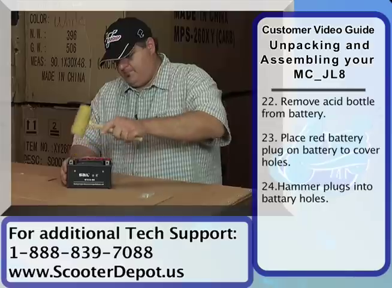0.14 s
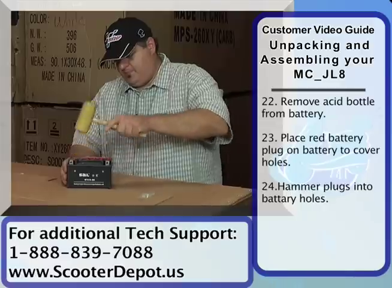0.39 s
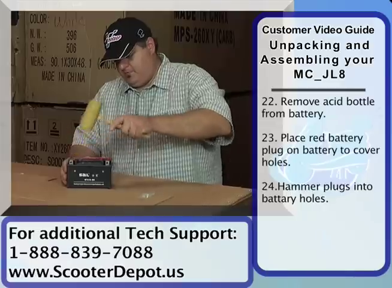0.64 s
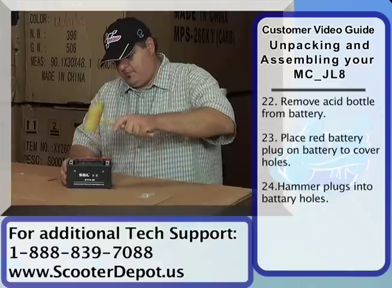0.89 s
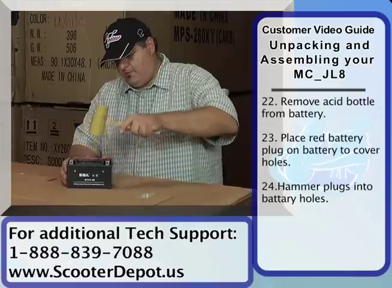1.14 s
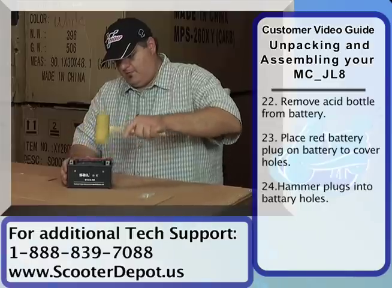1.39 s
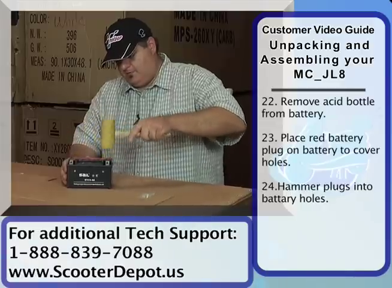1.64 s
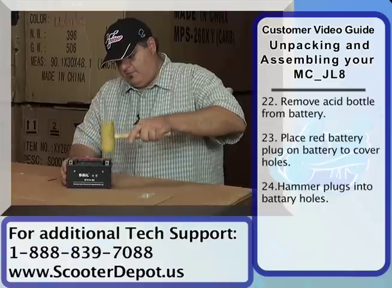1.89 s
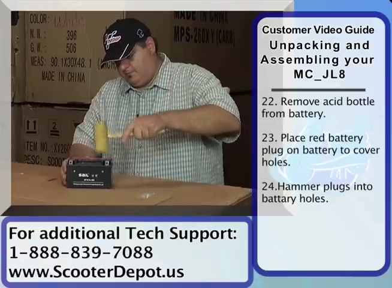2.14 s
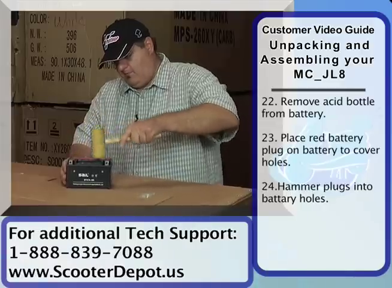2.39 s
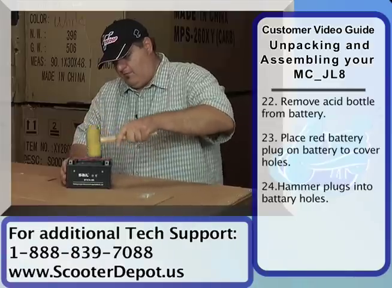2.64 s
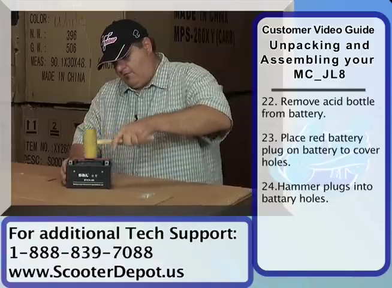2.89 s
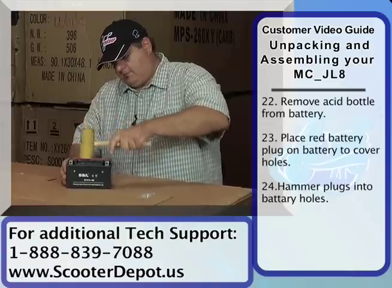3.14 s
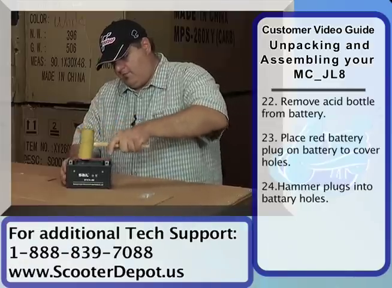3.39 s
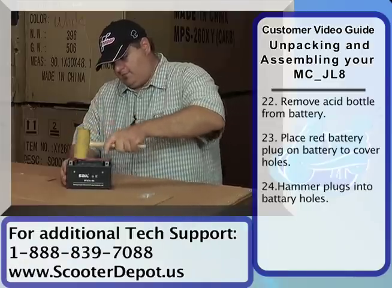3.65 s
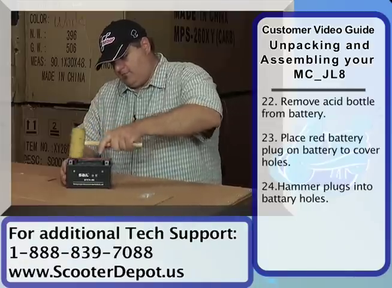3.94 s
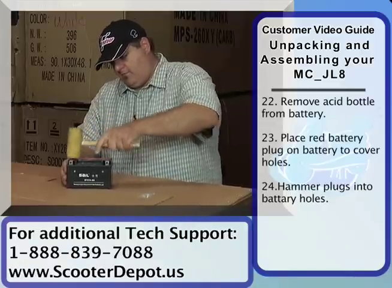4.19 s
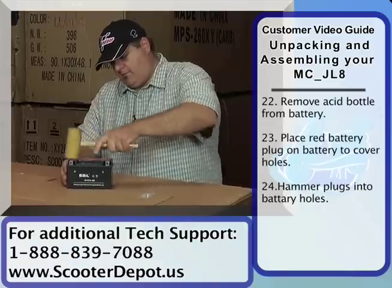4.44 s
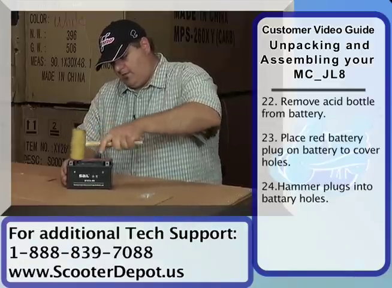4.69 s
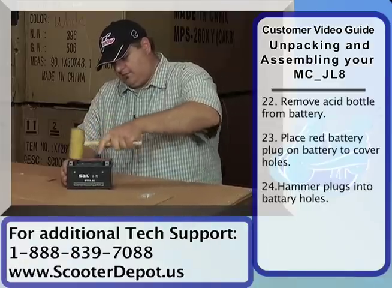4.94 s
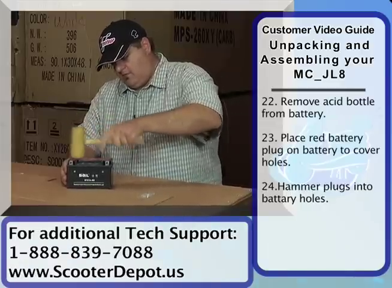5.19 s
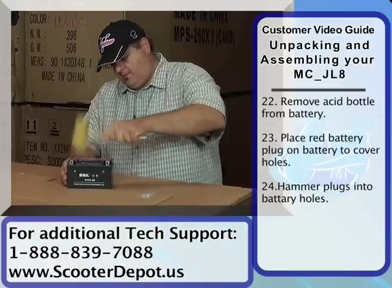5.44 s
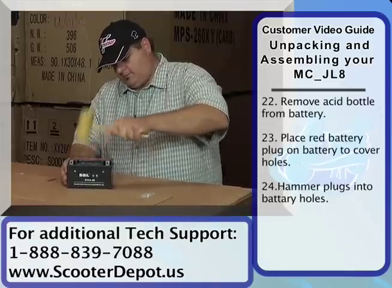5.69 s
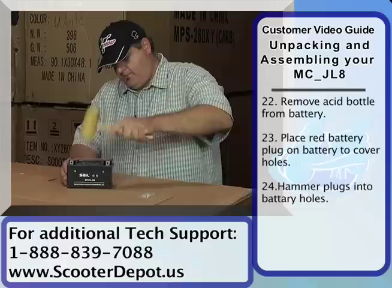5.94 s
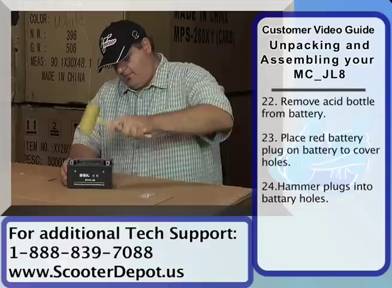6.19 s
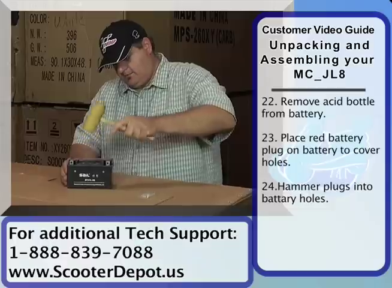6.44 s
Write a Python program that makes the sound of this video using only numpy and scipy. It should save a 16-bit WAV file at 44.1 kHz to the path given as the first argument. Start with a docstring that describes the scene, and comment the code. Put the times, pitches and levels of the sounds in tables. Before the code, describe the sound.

Quick even mallet taps crack against a plastic-topped battery on a wooden table, with rattling double clicks and short echoes in a large storeroom.

```python
"""Mallet tapping on a battery

A small mallet taps a plastic strip onto a battery on a wooden table in a large storeroom. Blows and
landings are trains of clicks that ring damped modes, the case knock is a set of swelling and choked sines,
and the wooden table rings from soft pushes. The room's echo is decaying bands of noise that arrive late;
ceiling and nearby boxes are discrete delays, and the low steady floor is shaped noise."""
import sys
import numpy as np
from scipy import signal
from scipy.io import wavfile
from scipy.ndimage import uniform_filter1d

SR = 44100
rng = np.random.default_rng(int(sys.argv[2]) if len(sys.argv) > 2 else 0)


def magnitude_from_level(level_db):
    """Linear magnitude for a level in decibels (20 dB per decade)."""
    exponent = np.asarray(level_db, float) / 20
    return 10 ** exponent


def unload_wav(signal):
    """Save mono or channel-first audio to the path in sys.argv[1] as 16-bit WAV at rate SR, clipped to [-1, 1]."""
    wavfile.write(
        sys.argv[1],
        SR,
        np.round(np.clip(np.atleast_2d(signal).T, -1, 1) * 32767).astype(np.int16),
    )


N = 289737

# Mallet blows. Each row: start in seconds, relative crack level in dB, crack brightness in dB per octave,
# knock pitch in Hz, relative knock level in dB.
BLOWS = [(0.2102, -11, 2, 1595, -39), (0.48, -10.5, 3.5, 1420, -25), (0.7402, -10, 3, 1440, -27.5),
         (1.0016, -5.5, -0.5, 1310, -25.5), (1.2667, -9, 1.5, 1550, -36), (1.5302, -9.5, 2, 1370, -21),
         (1.7893, -9.5, 1, 1720, -12), (2.0525, -7.5, 3.5, 1312, -12), (2.3158, -11.5, 6.5, 1260, -17),
         (2.573, -4, -7.5, 1460, -19.5), (2.8405, -4, 2, 1200, -16.5), (3.1146, -1, -4, 1097, -21),
         (3.382, -8, -0.5, 1117, -15.5), (3.6501, -3.5, -4, 1154, -12.5), (3.9089, -4, -1.5, 1240, -18.5),
         (4.1701, -4, -1.2, 1080, -12.5), (4.4316, -7.5, -3.5, 1092, -13.5), (4.6972, -10, -6.5, 1200, -16),
         (4.9534, -10.5, 4.5, 1250, -16.5), (5.218, -9, 1.8, 1070, -13), (5.481, -8.5, 2.5, 1148, -12),
         (5.741, -9, 0.1, 1386, -17), (5.9949, -10, 1, 1510, -17.5), (6.2563, -6, -3, 1143, -14),
         (6.5139, -4.5, -3, 1179, -9.5)]
# Battery landings and further bounces. Each row: start in seconds, relative level in dB.
LANDINGS = [(0.2219, -30), (0.4955, -24), (0.7555, -26.5), (1.0144, -20.5), (1.2765, -22), (1.5437, -17.5),
            (1.5533, -29), (1.8096, -17), (2.069, -21), (2.077, -33.5), (2.337, -13), (2.596, -20.5),
            (2.8638, -12), (3.1366, -14.5), (3.152, -23), (3.406, -10), (3.421, -19.5), (3.6687, -21),
            (3.9243, -18.5), (4.1898, -20), (4.4504, -12.5), (4.461, -32.5), (4.7134, -15), (4.9682, -13.5),
            (5.236, -12.5), (5.501, -15.5), (5.509, -29), (5.7641, -14), (5.774, -28), (6.0186, -7),
            (6.2795, -21.5), (6.5402, -14.5), (6.554, -31.5), (6.5624, -28)]
# Dull rumbles a while after some blows. Each row: start in seconds, relative level in dB.
REBOUNDS = [(1.314, -45), (1.398, -46), (1.659, -45.5), (1.919, -42), (2.1, -43), (2.177, -41),
            (4.759, -46.5), (6.143, -52)]
# Faint lone ticks between blows. Each row: start in seconds, relative level in dB.
TICKS = [(0.3113, -52.5), (2.3894, -50), (2.8178, -49)]
# Spot struck along the strip. Each row: time in seconds, place from 0 (end) to 1 (middle).
STRUCK_PLACE = [(0, 0.38), (.8, 0.024), (1.6, 0.012), (2.4, 0.033), (3.2, 0.28), (4.0, 0.38), (4.8, 0.52),
                (5.6, 0.2), (6.5, 0.12)]
# Lower strip modes. Each row: frequency in Hz, relative level in dB, t60 in seconds.
STRIP_MODES = [(2090, -16.5, 0.01), (2743, -22.5, 0.0083), (3010, 4.5, 0.0031), (3860, -9, 0.0041),
               (4340, -12.5, 0.007)]
# Upper strip modes. Each row: frequency in Hz, relative level in dB, t60 in seconds.
STRIP_HIGH_MODES = [(5900, -31.5, 0.0096), (6504, -2, 0.0031), (7110, -6, 0.0029), (9700, -33, 0.018),
                    (11100, -32, 0.004), (13400, -51, 0.0026)]
# Modes of the air in the cells. Each row: frequency in Hz, relative level in dB, t60 in seconds.
HOLLOW_MODES = [(347, -7, 0.04), (560, -7.5, 0.02), (910, -10.5, 0.004)]
# Rumble modes. Each row: frequency in Hz, relative level in dB, t60 in seconds.
REBOUND_MODES = [(270, -1, 0.044), (381, -8, 0.071), (520, -4.5, 0.021), (640, -14.5, .03),
                 (750, -8.5, 0.02), (950, -21.5, 0.035)]
# Case knock partials. Each row: multiple of the knock pitch, relative level in dB.
KNOCK_PARTIALS = [(.72, -1.5), (1.0, 7.5), (1.362, -2.5), (1.7, -26.5)]
# Table top modes. Each row: frequency in Hz, relative level in dB, t60 in seconds,
# side (+1 towards the microphone, -1 away).
TABLE_TOP_MODES = [(151, -9.5, 0.037, 1), (230, 3, 0.022, -1), (274, -20, 0.0028, -1)]
# Table leg modes. Each row: frequency in Hz, relative level in dB, t60 in seconds,
# side (+1 towards the microphone, -1 away).
TABLE_LEG_MODES = [(26.5, -11, 0.6, 1), (51.35, 3.5, 0.23, 1), (74.5, -11.5, 0.48, 1),
                   (97.4, -9.5, 0.36, -1), (121.8, -13, 0.26, 1), (146.3, -3, 0.18, -1),
                   (204, -22.5, 0.22, 1), (248.8, -13.5, 0.25, -1)]
# Room echo spectrum. Each row: frequency in Hz, relative level in dB, t60 in seconds.
ROOM = [(30, -19.5, 0.12), (111, -7, 0.2), (265, -24.5, 0.38), (344, -26.5, 0.56), (700, -25.5, 0.32),
        (1200, -27, 0.5), (1920, -29, 0.47), (3180, -34.5, 0.71), (4240, -34.5, 0.71), (5200, -43.5, 0.96),
        (7560, -38, 0.58), (10000, -51, 0.29), (14560, -54.5, 0.44)]
# Floor spectrum. Each row: frequency in Hz, relative band level in dB.
FLOOR = [(15, -30), (25, 10.5), (53, 5.5), (157, -8), (236, 4.5), (301, -69), (384, -28.5), (607, -44.5),
         (734, -19), (4140, -37.5), (16000, -42)]

FLOOR_RMS_DB = -52
ROOM_DB, ROOM_RISE_S, WALLS_S, EARLY_SHARE = -9.5, 0.018, 0.021, 0.41
CEILING_S, CEILING_DB, CEILING_CUTOFF_HZ = 0.012, -28.5, 6000
# nearby boxes: first and last delay, level of each echo, loss over that span
NEAR_FIRST_S, NEAR_LAST_S, NEAR_DB, NEAR_LOSS_DB = 0.0022, 0.016, -36.5, 0.5
TABLE_DELAY_S, LEGS_EXTRA_DELAY_S = 0.0012, 0.00071
TABLE_TOP_DB, TABLE_TOP_DB_PER_PLACE = -12.0, -21  # at the strip's end; change to its middle
LEGS_DB, LEGS_DB_PER_PLACE, LEGS_DB_PER_KNOCK_DB = -27.5, 5.5, 0.23
LEGS_TILT_DB_PER_OCTAVE_PER_PLACE = -2.5
KNOCK_DELAY_S, KNOCK_T60_MIDDLE_S, KNOCK_END_SHARE = 0.0009, 0.0056, 0.7  # share: t60 at end / middle
KNOCK_SWELL_POWER = 0.98
HOLLOW_DB, HOLLOW_DB_PER_KNOCK_DB = -19, 1
SEATING_S, CHATTER_S = 0.0005, 0.004  # delay before the first touch; span of the later contacts
FIZZ_DB = -10  # upper strip modes relative to the crack
LANDING_KNOCK_DB = -20  # relative to the landing's level
LANDING_THUMP_DB, THUMP_DB_PER_PLACE, THUMP_DB_PER_LANDING_DB = -23.5, -3, 0.1
LANDING_LEGS_DB, LANDING_TILT_DB_PER_OCTAVE_PER_DB = -33.5, 0.15
LIMIT_PEAK, LIMIT_KNEE = 0.53, 3.1


def rms_one(x):
    """Scale to rms 1."""
    return x / np.sqrt(np.mean(x ** 2) + 1e-20)


def ring(clicks, hz, t60_s):
    """Two-pole resonator: a unit click starts a decaying sine of height 1."""
    radius = magnitude_from_level(-60 / (max(t60_s, 0.001) * SR))
    angle = 2 * np.pi * hz / SR
    poles = [1, -2 * radius * np.cos(angle), radius * radius]
    return signal.lfilter([0, np.sin(angle)], poles, clicks + 1e-18)


def clicks_at(seconds, sizes):
    """Click train with one sample per contact."""
    out = np.zeros(N)
    index = np.clip((np.asarray(seconds) * SR).astype(int), 0, N - 1)
    np.add.at(out, index, sizes)
    return out


def bands(length):
    """Narrow noise bands with their centres in Hz; neighbours are unrelated."""
    settle = 8000
    edges_hz = 24 * 2 ** np.arange(0, 9.7, 0.4)
    white = rng.standard_normal((2, length + settle))
    for k, (low, high) in enumerate(zip(edges_hz, edges_hz[1:])):
        sos = signal.butter(2, [low, high], "band", fs=SR, output="sos")
        yield np.sqrt(low * high), signal.sosfilt(sos, white[k % 2])[settle:]


def at_hz(points, hz):
    """Table columns interpolated on a log-frequency axis."""
    table_hz, *columns = np.transpose(points)
    return [np.interp(np.log(hz), np.log(table_hz), column) for column in columns]


def floor():
    """Steady room rumble and microphone hiss: noise bands weighted by the floor spectrum."""
    noise = sum(magnitude_from_level(at_hz(FLOOR, hz)[0]) * band for hz, band in bands(N))
    return magnitude_from_level(FLOOR_RMS_DB) * rms_one(noise)


def room(seconds, parts_hz, parts_db):
    """The room takes each blow's broad colour from all sides; far walls answer late, then each band dies."""
    t = np.arange(SR) / SR
    early = EARLY_SHARE * (1 - np.exp(-t / 0.0014))
    walls = 1 / (1 + np.exp((WALLS_S - t) / ROOM_RISE_S))
    # separate early reflections make the echo grainy before it blends
    grain = rms_one(uniform_filter1d(rng.standard_normal(SR), size=220))
    arrival = (early + walls) * magnitude_from_level(5.1 * grain * np.exp(-t / 0.071))
    out = 0
    for hz, noise in bands(SR):
        level_db, t60_s = at_hz(ROOM, hz)
        colour_db = [np.interp(np.log(hz), np.log(parts_hz), blow) for blow in np.transpose(parts_db)]
        echo = magnitude_from_level(level_db - 60 * t / t60_s) * rms_one(noise) * arrival
        sizes = magnitude_from_level(colour_db + rng.normal(0, 1.4, len(seconds)))
        out = out + signal.fftconvolve(clicks_at(seconds, sizes), echo)
    return out


def ceiling(x):
    """One dull early echo from above among small scattered ones from boxes nearby."""
    place = np.sort(rng.random(12))
    delay_s = NEAR_FIRST_S + (NEAR_LAST_S - NEAR_FIRST_S) * place
    taps = np.zeros(SR // 20)
    taps[(delay_s * SR).astype(int)] = magnitude_from_level(NEAR_DB - NEAR_LOSS_DB * place) * rng.choice([-1, 1], len(place))
    taps[int(CEILING_S * SR)] += magnitude_from_level(CEILING_DB)
    dull = signal.sosfilt(signal.butter(1, CEILING_CUTOFF_HZ, fs=SR, output="sos"), x)
    return signal.fftconvolve(dull, taps)[:N]


def table(seconds, db, modes, scatter_db, tilt_db=0):
    """A soft push rings the wooden modes; tilt is in dB per octave about 50 Hz."""
    out = 0
    for hz, mode_db, t60_s, side in modes:
        scatter = scatter_db * rng.standard_normal(len(seconds))
        sizes = magnitude_from_level(db + mode_db + tilt_db * np.log2(hz / 50) + scatter)
        out = out + np.sign(side) * ring(clicks_at(seconds + TABLE_DELAY_S, sizes), hz, t60_s)
    return out


def knock(seconds, hz, db, middle):
    """The hollow case knocks at a pitch set by the spot struck; the mallet head stays on and chokes it."""
    length = 2000
    out, t = np.zeros(N + length), np.arange(length) / SR
    for start_s, pitch_hz, level, place in zip(seconds, hz, magnitude_from_level(db), middle):
        age = t / (KNOCK_T60_MIDDLE_S * (KNOCK_END_SHARE + (1 - KNOCK_END_SHARE) * place))
        swell = age ** KNOCK_SWELL_POWER * magnitude_from_level(-60 * age ** 1.54)
        envelope = level * swell / swell.max()
        i = int((start_s + KNOCK_DELAY_S) * SR)
        for multiple, part_db in KNOCK_PARTIALS:
            out[i:i + length] -= magnitude_from_level(part_db) * envelope * np.sin(2 * np.pi * multiple * pitch_hz * t)
    return out[:N]


def chatter(seconds, db, modes, spread_s, count=6, tilt_db=0):
    """A sharp inward click, then uneven weakening contacts; tilt is in dB per octave about 3 kHz."""
    contact = np.arange(count)
    later_s = rng.random((len(seconds), count)) ** 1.6 * spread_s * (contact > 0)
    signs = np.where(contact > 0, rng.choice([-1, 1], later_s.shape), -0.6)
    times_s = (seconds[:, None] + SEATING_S + later_s).ravel()
    out = 0
    for hz, mode_db, t60_s in modes:
        struck_db = db + mode_db + tilt_db * np.log2(hz / 3000)
        scatter_db = rng.normal(0, 1.69, later_s.shape)  # each mode is struck anew
        sizes = magnitude_from_level(struck_db[:, None] + scatter_db - 20 * later_s / spread_s) * signs
        out = out + ring(clicks_at(times_s, sizes.ravel()), hz, t60_s)
    return out


def rebounds():
    """Dull rumble: many contacts spread over 0.14 s ring low modes."""
    start_s, db = np.transpose(REBOUNDS)
    return chatter(start_s, db, REBOUND_MODES, 0.14, count=40)


def ticks():
    """Faint lone ticks: bright contacts within 8 ms ring all strip modes."""
    start_s, db = np.transpose(TICKS)
    return chatter(start_s, db, STRIP_MODES + STRIP_HIGH_MODES, 0.008, count=6, tilt_db=5.0)


def landings(start_s, db, hz, middle):
    """The battery lands: a short chatter, duller when weak, and a case knock."""
    tilt_db = LANDING_TILT_DB_PER_OCTAVE_PER_DB * (db - db.mean())
    out = chatter(start_s, db - 9.5, STRIP_MODES, 0.0021, count=4, tilt_db=tilt_db)
    out += chatter(start_s, db - 18.5, STRIP_HIGH_MODES, 0.0023, count=4, tilt_db=tilt_db)
    return out + knock(start_s, 1.17 * hz, db + LANDING_KNOCK_DB, middle)


def blows(start_s, crack_db, fizz_db, tilt_db, hz, knock_db, hollow_db, middle):
    """The mallet's blows: chattering strip, knocking case and ringing air in the cells."""
    out = chatter(start_s, crack_db - 8, STRIP_MODES, CHATTER_S, count=10, tilt_db=tilt_db)
    out += chatter(start_s, fizz_db, STRIP_HIGH_MODES, CHATTER_S, count=10, tilt_db=tilt_db)
    out += knock(start_s, hz, knock_db, middle)
    return out + chatter(start_s, hollow_db, HOLLOW_MODES, 0.0002, count=2)


def scene():
    """Mix blows, landings, ticks, table and rebounds with their echoes and the floor."""
    blow_s, crack_db, tilt_db, hz, knock_db = np.transpose(BLOWS)
    land_s, land_db = np.transpose(LANDINGS)
    middle = np.interp(blow_s, *np.transpose(STRUCK_PLACE))
    land_middle = np.interp(land_s, blow_s, middle)
    land_hz = np.interp(land_s, blow_s, hz)

    swing_db = knock_db - knock_db.mean()
    top_db = TABLE_TOP_DB + TABLE_TOP_DB_PER_PLACE * middle
    legs_db = LEGS_DB + LEGS_DB_PER_PLACE * middle + LEGS_DB_PER_KNOCK_DB * swing_db
    hollow_db = HOLLOW_DB + HOLLOW_DB_PER_KNOCK_DB * swing_db
    fizz_db = crack_db + FIZZ_DB
    thump_db = LANDING_THUMP_DB + THUMP_DB_PER_PLACE * (land_middle - middle.mean())
    thump_db = thump_db + THUMP_DB_PER_LANDING_DB * (land_db - land_db.mean())
    legs_tilt_db = LEGS_TILT_DB_PER_OCTAVE_PER_PLACE * (middle - middle.mean())
    land_legs_db = np.full(len(land_s), LANDING_LEGS_DB)

    direct = blows(blow_s, crack_db, fizz_db, tilt_db, hz, knock_db, hollow_db, middle)
    direct += landings(land_s, land_db, land_hz, land_middle) + ticks()

    wood = table(blow_s, top_db, TABLE_TOP_MODES, scatter_db=-2.2)
    wood += table(land_s, thump_db, TABLE_TOP_MODES, scatter_db=1.0)
    # the push takes a moment to reach the legs
    legs_s = blow_s + LEGS_EXTRA_DELAY_S
    wood += table(legs_s, legs_db, TABLE_LEG_MODES, scatter_db=2.77, tilt_db=legs_tilt_db)
    # a landing rocks them back the other way
    wood -= table(land_s, land_legs_db, TABLE_LEG_MODES, scatter_db=3.0)
    wood += rebounds()

    # legs, top, hollow, knock, crack, fizz
    parts_hz = [60, 210, 600, 1250, 3200, 7000]
    parts_db = np.array([legs_db, top_db, hollow_db, knock_db, crack_db - 11.5, fizz_db + tilt_db])
    wet = room(blow_s, parts_hz, parts_db + ROOM_DB)
    # the series began earlier: tails like those before the fourth blow still hang in the room
    end = int(blow_s[3] * SR)
    lead = end - int(blow_s[0] * SR)
    wet[:end - lead] += magnitude_from_level(0.5) * (wet[lead:end] + wood[lead:end])
    return (direct + ceiling(direct) + wood + wet[:N] + floor())[None]


def roll_off(x):
    """The treble ends steeply here."""
    return signal.sosfilt(signal.butter(12, 17040, fs=SR, output="sos"), x)


def record(dry):
    """The microphone input flattens the hardest peaks by soft saturation."""
    mix = dry / (1 + np.abs(dry / LIMIT_PEAK) ** LIMIT_KNEE) ** (1 / LIMIT_KNEE)
    return roll_off(mix)


dry = scene()
out = record(dry)
unload_wav(out)
```